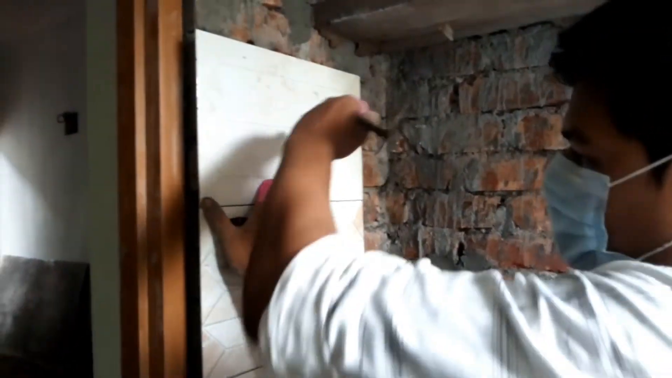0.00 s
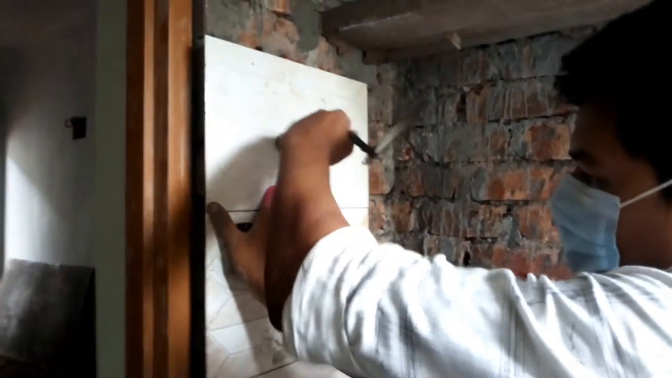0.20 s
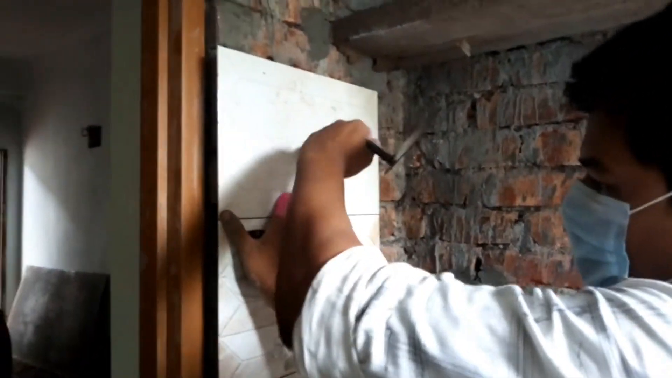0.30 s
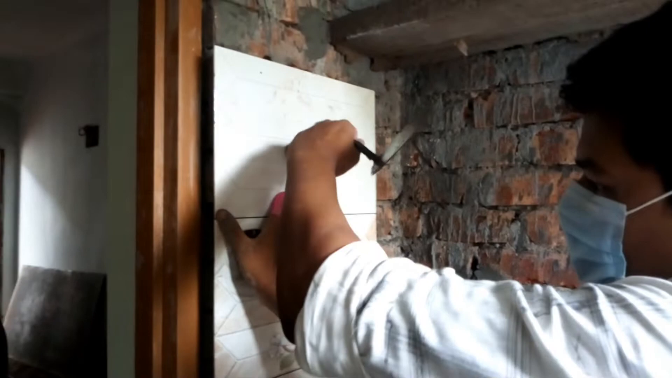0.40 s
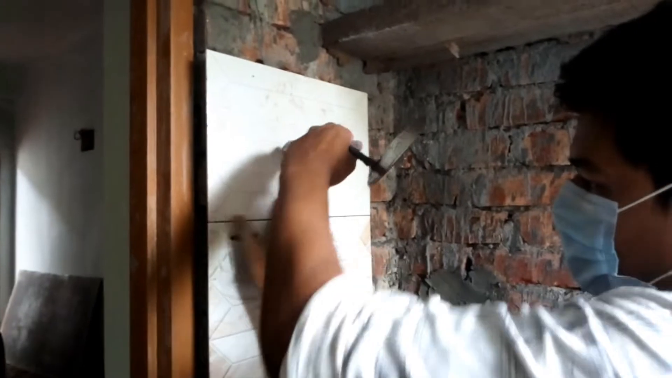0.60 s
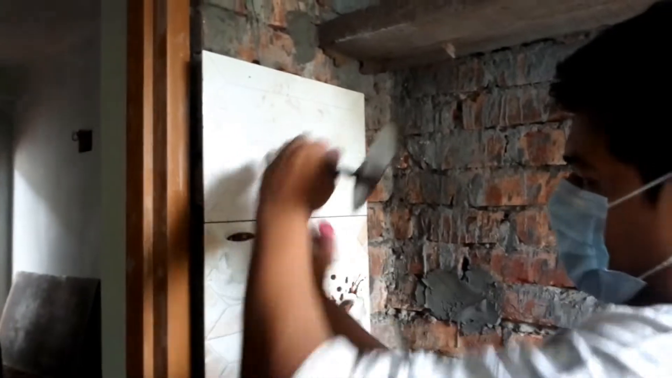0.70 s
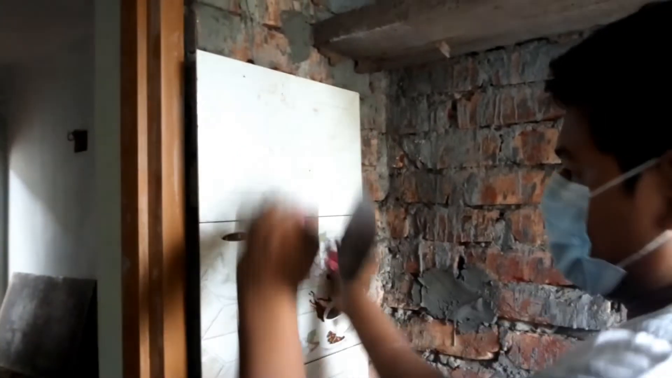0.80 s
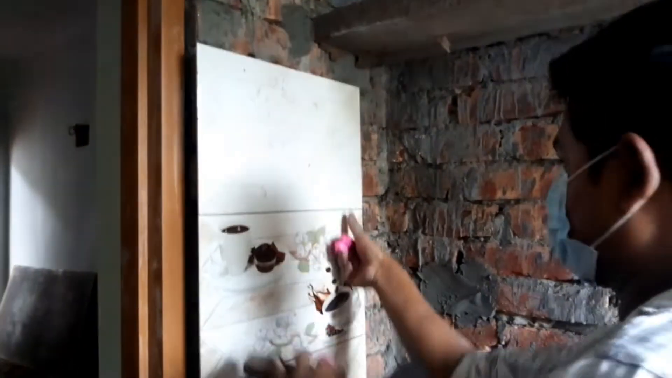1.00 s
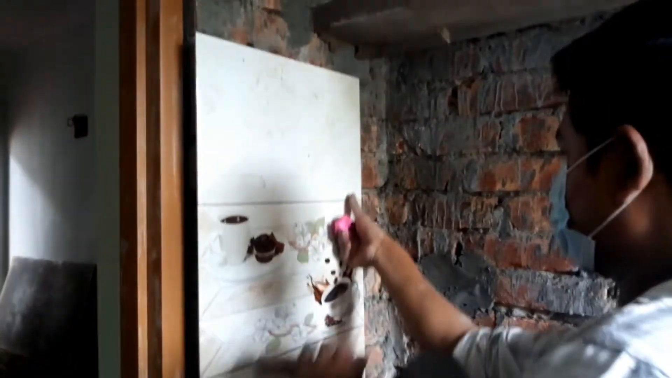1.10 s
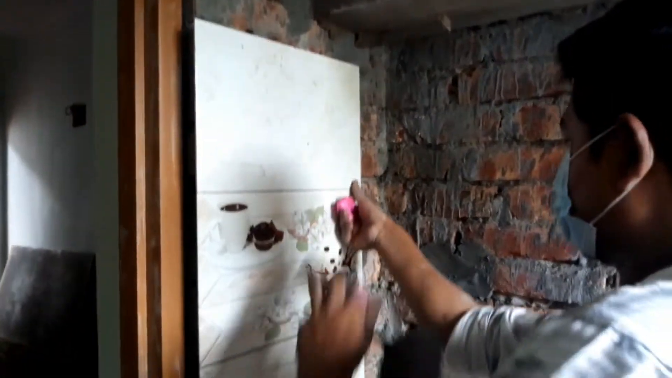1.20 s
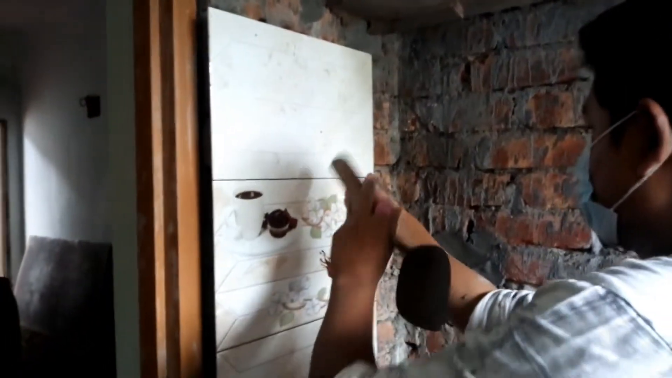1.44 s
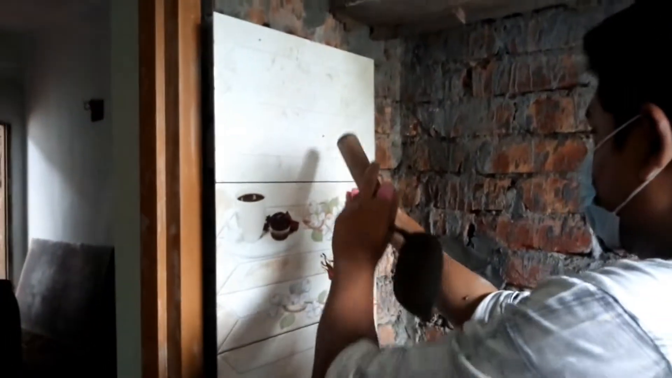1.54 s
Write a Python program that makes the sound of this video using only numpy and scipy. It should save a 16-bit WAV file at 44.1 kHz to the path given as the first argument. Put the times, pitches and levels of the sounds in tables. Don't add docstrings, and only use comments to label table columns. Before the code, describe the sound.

A rubber mallet strikes a ceramic wall tile twice in quick succession, loud hollow knocks with a short tile ring and boomy reverberation in a small bare brick room, close microphone, then faint outdoor hiss and soft distant thumps.

```python
import sys
import numpy as np
from scipy import signal
from scipy.io import wavfile

SR = 44100
rng = np.random.default_rng(int(sys.argv[2]) if len(sys.argv) > 2 else 0)


def how_loud(loudness_db):
    steps = np.asarray(loudness_db, float) / 20
    return 10 ** steps


def store_wav(level_fs):
    pcm = np.round(np.clip(np.atleast_2d(level_fs), -1, 1) * 32767)
    wavfile.write(sys.argv[1], SR, pcm.T.astype(np.int16))


N = 70560


def at_hz(points, hz, col=1):
    p = np.array(points)
    return np.interp(np.log(hz), np.log(p[:, 0]), p[:, col])


def rms_one(x):
    return x / np.sqrt(np.mean(x ** 2) + 1e-20)


def drift(rate_hz):
    r = np.exp(-2 * np.pi * rate_hz / SR)
    noise = rng.standard_normal(N + SR)
    return rms_one(signal.lfilter([1], [1, -2 * r, r * r], noise)[SR:])


def ring(x, hz, t60_s):
    r = how_loud(-60 / (t60_s * SR))
    w = 2 * np.pi * hz / SR
    return signal.lfilter([0, np.sin(w)], [1, -2 * r * np.cos(w), r * r], x + 1e-18)


def click(start_s, level_db):
    x = np.zeros(N)
    x[int(start_s * SR)] = how_loud(level_db)
    return x


def band_pass(x, low_hz, high_hz):
    return signal.sosfilt(signal.butter(2, [low_hz, high_hz], "band", fs=SR, output="sos"), x)


def band(x, hz, width_hz):
    return band_pass(x, hz - width_hz / 2, hz + width_hz / 2)


def bands(gain):
    edges = 30 * 2 ** (np.arange(28) / 3)
    white = rng.standard_normal((2, N))
    total = 0
    for k, (low, high) in enumerate(zip(edges, edges[1:])):
        total = total + gain(np.sqrt(low * high)) * band_pass(white[k % 2], low, high)
    return total


# pitch_hz [Hz], level_db [dB]
AIR_SPECTRUM = [(30, -15.5), (60, -13), (110, -2.5), (200, -6.5), (600, -16), (1300, -16.5), (3800, -18.5),
                (7500, -18.5), (9500, -47), (12500, -25.5), (15000, -49)]


def outdoor_hiss():
    return how_loud(-59.5) * rms_one(bands(lambda hz: how_loud(at_hz(AIR_SPECTRUM, hz) + .8 * drift(8))))


# pitch_hz [Hz], width_hz [Hz], level_db [dB], slope_db [dB/s]
INSECT_BANDS = [(2400, 900, -59.5, -4.5), (5130, 590, -68.5, -0.6), (6880, 2020, -69.5, 1.3)]


def insects():
    t = np.arange(N) / SR
    x = 0
    for hz, width_hz, level_db, slope_db in INSECT_BANDS:
        level = how_loud(level_db + slope_db * t + drift(8))
        x = x + level * rms_one(band(rng.standard_normal(N), hz, width_hz))
    return x


# start_s [s], level_db [dB]
CHIRR_LEVEL = [
    (0, -70),
    (.14, -67),
    (.2, -89),
    (0.751, -78),
    (.84, -58.5),
    (.95, -91),
    (1.6, -69.5),
]


def chirr():
    level_db = np.interp(np.arange(N) / SR, *np.transpose(CHIRR_LEVEL))
    level = how_loud(level_db + 1.9 * drift(50))
    return level * rms_one(band(rng.standard_normal(N), 5120, 160))


# start_s [s], level_db [dB], head_ring_db [dB]
BLOWS = [
    (0.2087, -2.5, 2),
    (0.4010, -3, -4.5),
]


def wall_thud():
    lead_s, rise_s, level_db, t60_s = .0122, 0.0011, -36, .15
    t = np.arange(N) / SR
    envelope = 0
    for start_s, _, _ in BLOWS:
        since = t - start_s + lead_s
        rise = np.clip(since / rise_s, 0, 1) ** 2
        envelope = envelope + rise * how_loud(level_db - 60 * np.clip(since, 0, 9) / t60_s)
    spectrum = [(100, -0.5), (300, 11.5), (900, 0.5), (2600, -17), (3600, -42)]   # Hz, dB
    return envelope * rms_one(bands(lambda hz: how_loud(at_hz(spectrum, hz))))


CONTACT_TIMES = (.00054, .00042)


def contact_force():
    t = np.arange(N) / SR
    force = 0
    for (start_s, level_db, _), contact_s in zip(BLOWS, CONTACT_TIMES):
        pulse = np.sin(np.pi * np.clip((t - start_s) / contact_s, 0, 1)) ** 2
        force = force + how_loud(level_db) * 2 / (contact_s * SR) * pulse
    return force


# pitch_hz [Hz], level_db [dB], t60_s [s]
TILE_MODES = [(542, -7.5, .018), (820, -3.5, 0.0092), (992, -6.5, 0.006), (1400, -10, 0.01),
              (2230, -10.5, 0.0077), (3194, -18, 0.0083), (4300, -12.5, 0.008)]


def tile_knock():
    unit = click(0, 0)
    knock = 0
    for k, (hz, level_db, t60_s) in enumerate(TILE_MODES):
        knock = knock + (-1) ** (k + 1) * how_loud(level_db) * ring(unit, hz, t60_s)
    return knock


# pitch_hz [Hz], level_db [dB], t60_s [s]
HEAD_MODES = [(3960, -55, 0.24), (4470, -49, 0.18), (4700, -54, 0.086), (5230, -61, 0.31),
              (6340, -53.5, 0.11), (6920, -66, .12)]


def mallet_head():
    head = 0
    for start_s, _, head_ring_db in BLOWS:
        for hz, level_db, t60_s in HEAD_MODES:
            strike = click(start_s + rng.uniform(0, 0.0029), head_ring_db + level_db)
            head = head + ring(strike, hz, t60_s)
    return head


def head_flutter():
    return how_loud(6.1 * drift(58))


# delay_s [s], level_db [dB], sign [signed factor]
WALL_ECHOES = [
    (.0022, 2.5, 1),
    (.0073, -16, 0.4),
    (.0152, -8, -1.6),
    (.017, -18, 1),
    (.0245, -24, 1),
    (.0377, -8.5, 0.56),
]


def early_paths():
    paths = click(0, 0)
    for delay_s, level_db, sign in WALL_ECHOES:
        paths = paths + sign * click(delay_s, level_db)
    return paths


# pitch_hz [Hz], level_db [dB], t60_s [s], swell_s [s]
LONG_RINGS = [(168.7, -22.5, 0.97, 0.01), (200.93, -24.5, 1.2, 0.09), (234.1, -23.5, 0.99, 0.05),
              (246.5, -16.5, 0.97, 0.015), (295.6, -24.5, 0.94, 0.0068), (324.5, -32, 1.1, 0.026),
              (365, -25.5, 0.79, 0.012), (465.6, -24, 0.63, 0.045), (542, -21.5, 0.4, 0.03),
              (631.7, -27.5, 0.72, 0.0076), (827.5, -27.5, 0.44, .01), (942, -31, .5, 0.0033),
              (1170, -40.5, 0.33, 0.012),
              (1394, -25.5, .37, 0.0043), (1614, -24.5, 0.36, .004), (1938, -35, 0.18, 0.0089),
                (2093, -24.5, 0.38, .004), (2300, -41.5, .35, 0.0027), (2600, -33.5, 0.6, .003),
                (3166, -23, .28, .003), (4210, -40, 0.14, .003), (4420, -27, .22, .003)]


def long_rings():
    t = np.arange(N) / SR
    rings = 0
    for hz, level_db, t60_s, swell_s in LONG_RINGS:
        envelope = how_loud(level_db - 60 * t / t60_s) * (1 - np.exp(-t / swell_s))
        rings = rings + envelope * np.sin(2 * np.pi * (hz * t + rng.random()))
    return rings


# pitch_hz [Hz], level_db [dB], t60_s [s], beat_hz [Hz], first_swell_s [s]
SPLIT_MODES = [(113.5, -23.5, 1, 2.93, 0.14), (274.2, -26.5, 1.0, 3.9, 0.039),
               (1110, -17, 0.92, 5.4, 0.053)]


def beating_modes():
    beat_depth, settle_s, settle_db = .7, .245, -14
    t = np.arange(N) / SR
    grip_db = settle_db / (1 + np.exp(-np.clip((t - settle_s) / .006, -30, 30)))
    modes = 0
    for hz, level_db, t60_s, beat_hz, first_swell_s in SPLIT_MODES:
        beat = 1 - beat_depth * np.sin(np.pi * beat_hz * (t - first_swell_s)) ** 2
        decay = how_loud(level_db - 60 * t / t60_s + grip_db * (hz > 500))
        modes = modes + decay * beat * (1 - np.exp(-t / .008)) * np.sin(2 * np.pi * hz * t)
    return modes


# pitch_hz [Hz], level_db [dB per Hz], t60_s [s]
ROOM_DECAY = [(41, -14, 1), (101.7, -5.5, .85), (250, 1.5, 0.98), (583, -6, .65), (1037, -6.5, 0.66),
              (1887, -11.5, 0.55), (3000, -5, 0.19), (4500, -9, 0.38), (6000, -19.5, 0.56)]


def diffuse_tail():
    level_db, swell_s, lump_db = -15.5, 0.0094, 1.0
    t = np.arange(N) / SR

    def gain(hz):
        decay_db = at_hz(ROOM_DECAY, hz) - 60 * t / at_hz(ROOM_DECAY, hz, col=2)
        return how_loud(decay_db + lump_db * drift(29.6))

    tail = bands(gain)
    tail = tail / np.std(tail[:SR // 20])
    return tail * how_loud(level_db) * (1 - np.exp(-t / swell_s))


def knocks():
    tile = signal.fftconvolve(tile_knock(), early_paths())[:N]
    response = tile + long_rings() + beating_modes() + diffuse_tail()
    return signal.fftconvolve(contact_force(), response)[:N]


# start_s [s], level_db [dB], pitch_hz [Hz]
GRIT_TICKS = [
    (.397, -76, 12000),
    (1.235, -66, 9440),
]


def grit_ticks():
    t = np.arange(N) / SR
    x = 0
    for start_s, level_db, hz in GRIT_TICKS:
        burst = how_loud(level_db) * np.exp(-((t - start_s) / .003) ** 2) * rng.standard_normal(N)
        x = x + band(burst, hz, 2400)
    return x


# start_s [s], level_db [dB], rise_s [s]
FAR_THUMPS = [
    (1.234, -58, 0.028),
    (1.309, -56.5, 0.021),
    (1.385, -57.5, 0.018),
]


def far_thumps():
    t = np.arange(N) / SR
    x = 0
    for start_s, level_db, rise_s in FAR_THUMPS:
        u = np.clip(t - start_s, 0, 9) / rise_s
        low_mode = np.sin(2 * np.pi * 112 * t)
        upper_mode = 0.61 * np.sin(2 * np.pi * 188 * t + 6 * rng.random())
        rustle = 2.7 * band(rng.standard_normal(N), 376, 290)
        x = x + how_loud(level_db) * u * np.exp(1 - u) * (low_mode + upper_mode + rustle)
    return x


def scene():
    lull_s, lull_length_s, lull_db = .203, .005, -7
    t = np.arange(N) / SR
    lull = how_loud(lull_db * np.exp(-((t - lull_s) / lull_length_s) ** 2))
    head = mallet_head()
    thud = wall_thud()
    mallet = thud + knocks() + head * head_flutter()
    air = outdoor_hiss() + insects() + chirr()
    return (mallet + lull * air + far_thumps() + grit_ticks())[None]


def band_limit(x):
    return signal.sosfilt(signal.butter(12, 15630, fs=SR, output="sos"), x)


def record(dry):
    low_cut_hz, ceiling = 72, 1.5
    x = signal.sosfilt(signal.butter(2, low_cut_hz, "high", fs=SR, output="sos"), dry)
    mix = ceiling * np.tanh(x / ceiling)
    return band_limit(mix)


dry = scene()
out = record(dry)
store_wav(out)
```